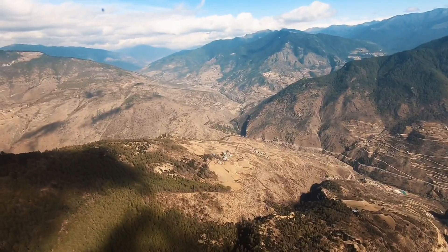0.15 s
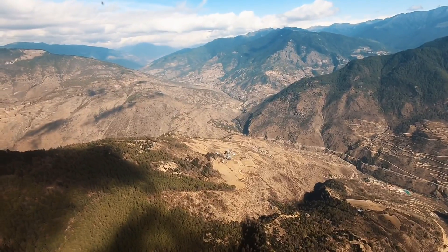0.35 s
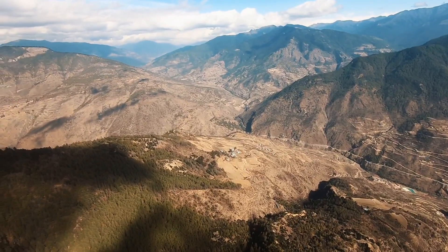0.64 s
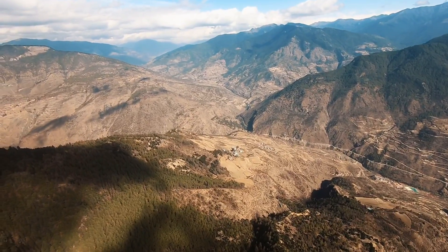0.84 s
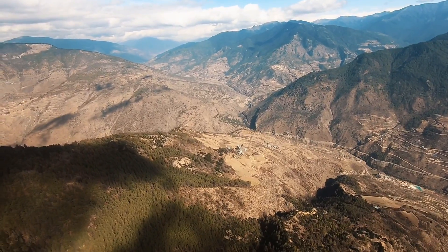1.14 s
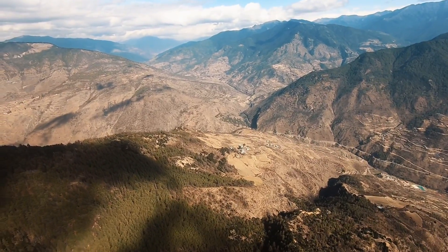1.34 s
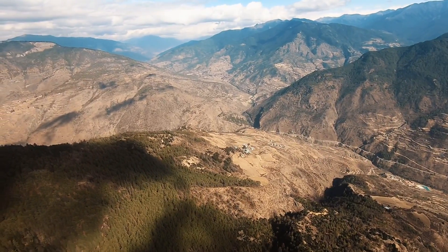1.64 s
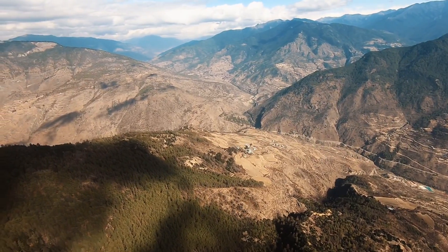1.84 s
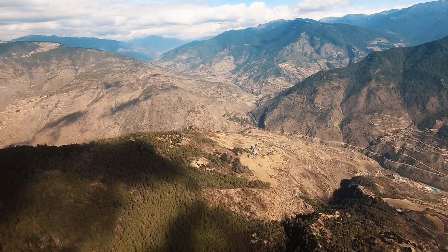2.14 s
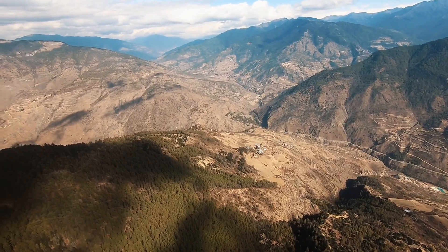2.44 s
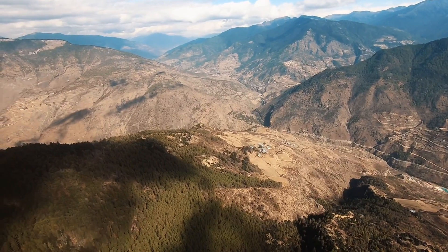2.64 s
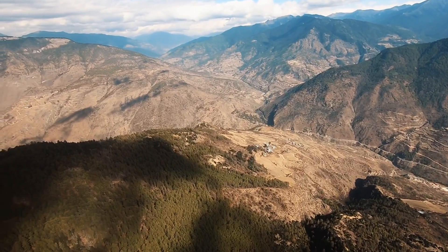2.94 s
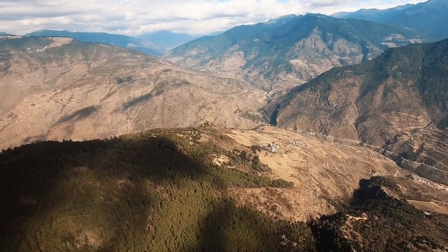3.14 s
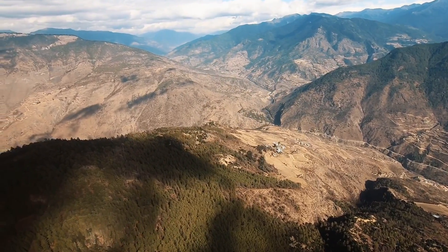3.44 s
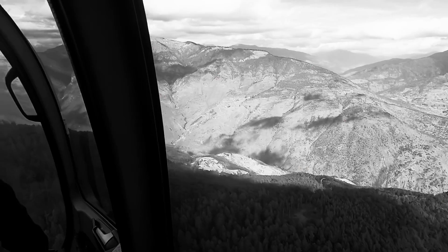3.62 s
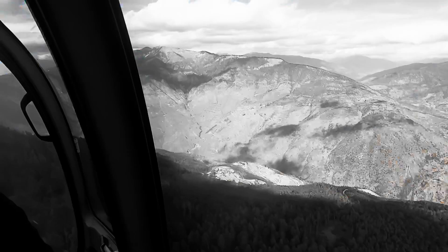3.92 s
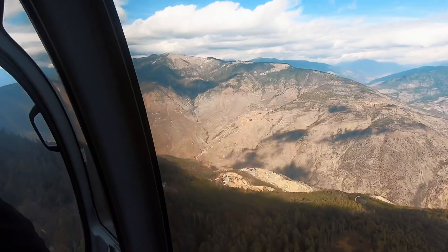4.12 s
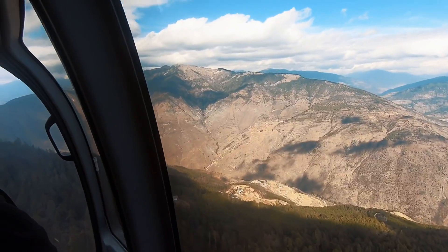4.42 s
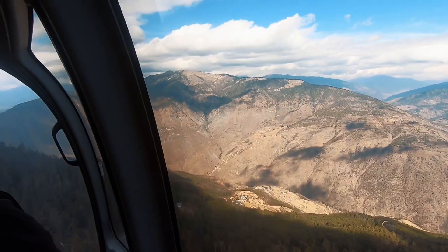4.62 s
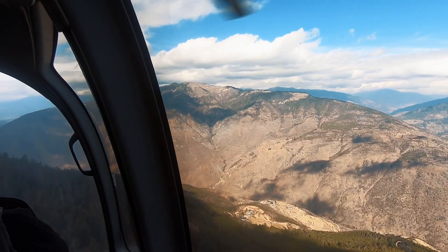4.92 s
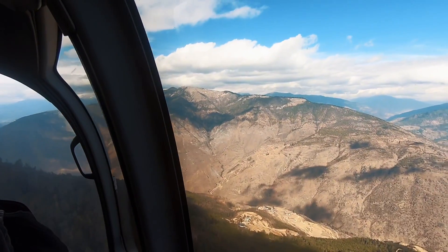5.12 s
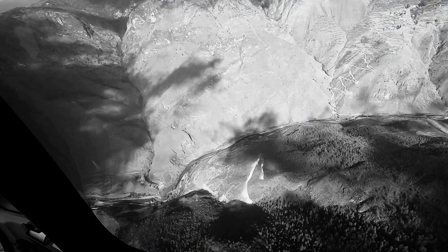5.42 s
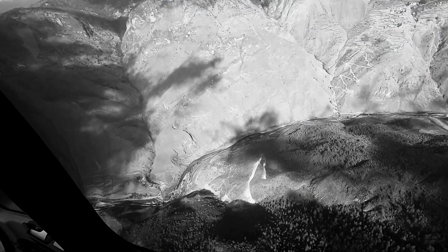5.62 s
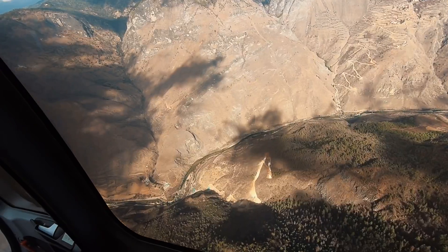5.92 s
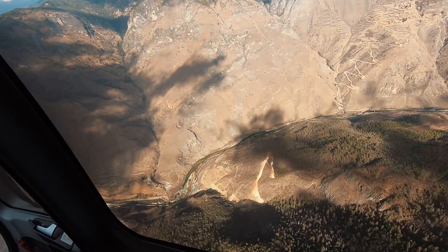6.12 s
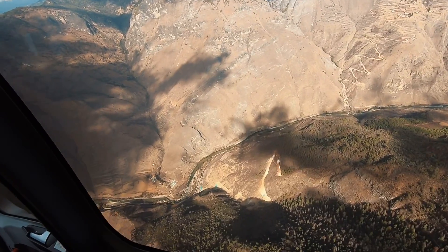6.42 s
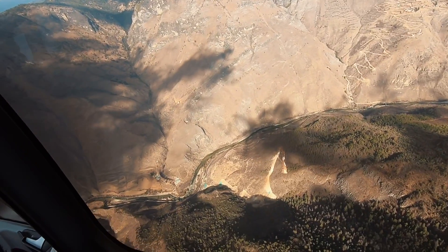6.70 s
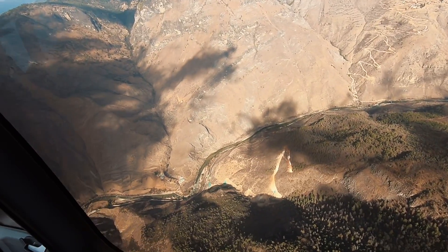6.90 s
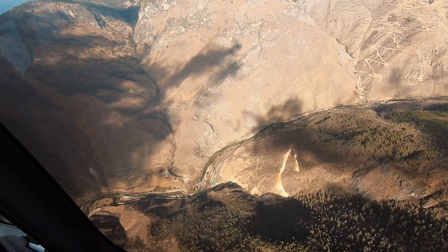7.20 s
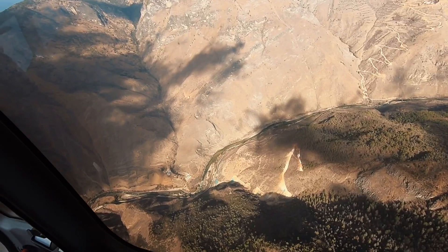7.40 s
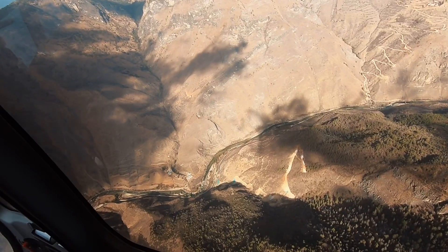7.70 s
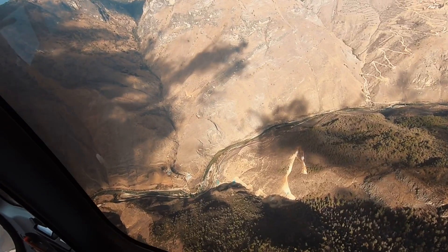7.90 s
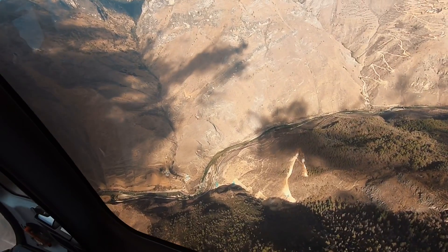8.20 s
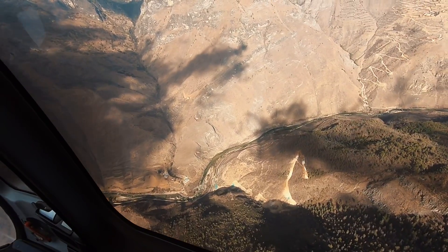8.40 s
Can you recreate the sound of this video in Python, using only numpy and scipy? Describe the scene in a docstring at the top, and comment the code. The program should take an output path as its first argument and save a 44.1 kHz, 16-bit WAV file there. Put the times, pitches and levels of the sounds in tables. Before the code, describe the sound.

Steady, bass-heavy helicopter drone heard from the cabin, blades thudding rapidly under a dull roar, its tone jumping at two hard cuts.

```python
"""Helicopter cabin in flight, heard from three seats in turn, joined by hard cuts at 3.44 s and 5.40 s.
From the first seat on, blade passes thump as low tones over buffeting air. Cabin resonances colour
the engine roar, gears whine, the turbine hisses and a faint tick recurs every 0.98 s from about 1 s.
Each cut changes levels and spectra and fades back in; at the third seat come three high chirps past 8.2 s.
Tones are wavering sines, the air is shaped noise, ticks and chirps are short sine swells."""
import sys
import numpy as np
from scipy import signal
from scipy.fft import rfft, irfft
from scipy.io import wavfile
from scipy.ndimage import uniform_filter1d, minimum_filter1d

SR = 44100
rng = np.random.default_rng(int(sys.argv[2]) if len(sys.argv) > 2 else 0)


def materialize(psi):
    """Save the field psi as 16-bit PCM at rate SR to the path in sys.argv[1].

    A 1-D psi becomes a single channel; in a 2-D psi each row is a channel.
    """
    bounded = np.clip(np.atleast_2d(psi).T, -1, 1)
    quanta = np.round(bounded * 32767).astype(np.int16)
    wavfile.write(sys.argv[1], SR, quanta)


N = 377099  # samples

# Levels are dB re full scale, rms unless called peak, before the limiter. Levels drift as the microphone turns.
# Cuts between seats: (time [s], wave height at the cut before the drop [full scale], fade-in [s])
CUTS = [(3.4358, -0.22, 0.013), (5.4037, 0.15, 0.011)]
# Blade-pass multiples: (multiple, then per seat a pair: start level [dB], end level [dB])
BLADE_MULTIPLES = [(1, (-27, -29), (-27.5, -28), (-30, -33.5)), (2, (-17.5, -16), (-18.5, -23), (-18, -18)),
                   (3, (-24, -24.5), (-24, -17.5), (-23, -21)), (4, (-23, -25.5), (-23.5, -30.5),
                   (-28, -28.5)), (5, (-38, -37), (-36.5, -41), (-39, -41.5)), (6, (-33.5, -33),
                   (-34, -33.5), (-28.5, -32.5)), (7, (-34, -30), (-37, -33), (-33, -34.5))]
# Tone beating with the third multiple, a row a seat: (time of one beat crest [s], level [dB])
BEAT_TONES = [(.91, -32), (4.44, -34.5), (6.47, -36)]
# Drive shaft hum: (level [dB]) a seat
SHAFT_LEVELS_DB = [-32, -30.5, -33]
# Hull buffeting spectrum, a list a seat: (frequency [Hz], relative density [dB per Hz])
BUFFET_SPECTRA = [
    [(5.9, -34), (10, -15.5), (37, -19.5), (61, 0), (218, -7.5), (308, -17), (378, -27.5), (600, -41.5),
     (780, -70.5), (1320, -120)],
    [(5.9, -36), (10, -24.5), (43, -18), (69, -5), (135, -5.5), (273, -14), (313, -16.5), (371, -30),
     (506, -35), (600, -47.5), (780, -55.5), (1320, -120)],
    [(5.9, -35), (10, -15.5), (48, -12), (65, -2), (98, -7.5), (135, -4.5), (292, -13.5), (318, -15),
     (365, -26.5), (600, -50), (780, -70.5), (1320, -120)],
]
# Hull buffeting, a row a seat: (start, middle, end level [dB])
BUFFET_LEVELS_DB = [(-18.5, -18.5, -16), (-18, -17, -17), (-18, -17.5, -17.5)]
# Engine roar spectrum with cabin resonances, a list a seat: (frequency [Hz], relative density [dB per Hz])
ROAR_SPECTRA = [
    [(260, -36), (450, -7), (612, -10.5), (689, -7), (736, 0), (821, -4), (1100, -5.5), (1190, -16.5),
     (1290, -13.5), (1590, -15), (1740, -13.5), (1940, -18), (2070, -23), (2380, -36.5), (2600, -38.5),
     (3380, -51), (5720, -120)],
    [(260, -21), (450, -19.5), (569, -15.5), (704, -1.5), (910, -16), (937, -13.5), (1100, -18),
     (1270, -17), (1560, -22.5), (1650, -25.5), (1690, -22.5), (1790, -22), (1870, -21.5), (2200, -33.5),
     (2600, -40.5), (3380, -45), (5720, -120)],
    [(260, -23.5), (450, -1), (541, -6), (590, -10), (704, 0.5), (763, -2), (840, -0.5), (904, -4),
     (951, -9.5), (1060, -7), (1280, -15.5), (1710, -12), (1790, -13.5), (2230, -26.5), (2600, -35.5),
     (3380, -58), (5720, -120)],
]
# Engine roar, a row a seat: (start, end level [dB])
ROAR_LEVELS_DB = [(-39, -40.5), (-39, -37), (-38, -37)]
# Turbine hiss spectrum: (frequency [Hz], relative density [dB per Hz])
HISS_SPECTRUM = [(1800, -19), (2200, -1), (3300, -3.5), (3700, -5.5), (5600, -8.5), (6000, -13.5),
                 (7000, -21.5), (9500, -28.5), (10300, -36), (11300, -30.5), (12300, -17), (14200, -21.5),
                 (15000, -26.5), (16500, -25)]
# Turbine hiss: (level [dB]) a seat
HISS_LEVELS_DB = [-56.5, -56, -56.5]
# Hollow cabin resonance, a row a seat: (start, end centre [Hz])
HOLLOW_CENTRES_HZ = [(809, 760), (700, 710), (782, 815)]
# Hollow cabin resonance, a row a seat: (start, middle, end level [dB])
HOLLOW_LEVELS_DB = [(-44.5, -48, -42), (-45.5, -42, -45), (-51, -43.5, -44.5)]
# Gear whine, a row a seat: (level [dB]) at four evenly spaced points
WHINE_LEVELS_DB = [(-58.5, -56.5, -60, -57), (-67.5, -57, -52.5, -53), (-56, -59, -51, -57.5)]
# Fifth multiple of the gear mesh, a row a seat: (level [dB]) at four evenly spaced points
MESH_FIFTH_DB = [(-72.5, -69.5, -72, -72), (-79, -61.5, -65.5, -63.5), (-82, -81, -81.5, -82)]
# Fourth multiple of the gear mesh, a row a seat: (start, middle, end level [dB])
MESH_FOURTH_DB = [(-70.5, -74.5, -64.5), (-68.5, -70, -72), (-84, -84, -86)]
# Hum bands, some around multiples of the gear mesh (1314, 1970, 3284 Hz), the rest around other shaft rates:
# (centre [Hz])
HUM_CENTRES_HZ = [817, 1260, 1314, 1970, 2490, 3128, 3284, 3850, 4310, 4650, 5010, 5510, 12450]
# The same bands: (width [Hz], first, second, third seat level [dB])
HUM_BANDS = [(45, -51.5, -60, -54), (90, -65.5, -53.5, -62), (30, -60, -61, -66), (30, -66, -65.5, -65.5),
             (30, -79, -71.5, -81.5), (80, -72.5, -66.5, -76.5), (100, -77.5, -69.5, -80),
             (50, -81, -73.5, -77.5), (130, -70.5, -67, -67.5), (150, -76, -72, -77.5),
             (150, -72.5, -74, -76), (90, -78, -73, -73.5), (200, -85, -85.5, -85)]
# High chirps: (time [s], peak level [dB])
CHIRP_EVENTS = [(8.2222, -60), (8.2741, -54.5), (8.526, -53)]

BLADES_HZ, BEAT_HZ, SHAFT_HZ = 19.69, 1.68, 102.1
WHINE_HZ, MESH_HZ = 1736.5, 656.8
FIRST_TICK_S, TICK_EVERY_S, TICK_PEAK_DB = .9757, .98419, -52.5
CABIN_T60_S, CABIN_WET_DB, CABIN_SHIFT_S = .06, -7.5, .8  # wet level re dry
LIMIT_PEAK, BAND_EDGE_HZ = 0.43, 15750


def rotor():
    """Each blade pass pushes the cabin air: low multiples of one rate, a beating neighbour and the shaft."""
    t = np.arange(N) / SR
    blade_turns = np.cumsum(BLADES_HZ + 0.031 * wander(rate_hz=1.5)) / SR
    out = tone(SHAFT_HZ, by_seat(SHAFT_LEVELS_DB), waver_hz=0.18, flutter_db=1.5)
    crest_s, beat_db = np.transpose(BEAT_TONES)
    for k, *seat_levels in BLADE_MULTIPLES:
        start_turns = by_seat(rng.random(2)[[0, 1, 1]])  # the second cut keeps step with the blades
        angle = 2 * np.pi * (k * blade_turns + start_turns)
        level_db = drift(seat_levels) + 0.91 * wander(rate_hz=5)
        out = out + np.sqrt(2) * gain_of(level_db) * np.cos(angle)
        if k == 3:
            beat_angle = angle + 2 * np.pi * BEAT_HZ * (t - by_seat(crest_s))
            out = out + np.sqrt(2) * gain_of(by_seat(beat_db)) * np.cos(beat_angle)
    return out


def buffeting():
    """Air buffets the hull: low shaped noise with a slowly wandering level."""
    level_db = drift(BUFFET_LEVELS_DB) + 1.1 * wander(rate_hz=2.5)
    return gain_of(level_db) * by_seat([noise(s, size=4096, patchy_db=0.28) for s in BUFFET_SPECTRA])


def engine_roar():
    """Engine noise shaped by the cabin's resonances at each seat."""
    level_db = drift(ROAR_LEVELS_DB) + .5 * wander(rate_hz=2.8)
    return gain_of(level_db) * by_seat([noise(s, size=1024, patchy_db=0.3) for s in ROAR_SPECTRA])


def hollow_resonance(width_hz):
    """Noise shifted up to a wandering centre: a resonance that growls in surges."""
    centre_hz = drift(HOLLOW_CENTRES_HZ) + 18 * wander(rate_hz=5)
    level_db = drift(HOLLOW_LEVELS_DB) + 0.98 * wander(rate_hz=7)
    low_pass = signal.butter(2, width_hz / 2, fs=SR, output="sos")
    a, b = signal.sosfilt(low_pass, rng.standard_normal((2, N)))
    angle = 2 * np.pi * np.cumsum(centre_hz) / SR
    return gain_of(level_db) * evened(a * np.cos(angle) + b * np.sin(angle))


def gears():
    """Thin whines of the gear mesh and fuzzy noise bands, some around further mesh multiples, the rest around
    other shaft rates."""
    whines = [(WHINE_HZ, WHINE_LEVELS_DB, 2.5, 1.0),
              (5 * MESH_HZ, MESH_FIFTH_DB, 1.8, 1.9),
              (4 * MESH_HZ, MESH_FOURTH_DB, 1.8, 1.9)]
    out = np.zeros(N)
    for hz, seat_levels, waver_hz, flutter_db in whines:
        level_db = drift(seat_levels) + 1.5 * wander(rate_hz=2.5)
        out = out + tone(hz, level_db, waver_hz, flutter_db)
    f = np.fft.rfftfreq(N, 1 / SR)
    for hz, (width_hz, *seat_db) in zip(HUM_CENTRES_HZ, HUM_BANDS):
        band = rfft(rng.standard_normal(N)) / (1 + (2 * (f - hz) / width_hz) ** 4)
        level_db = by_seat(seat_db) + 1.0 * wander(rate_hz=2.5)
        out = out + gain_of(level_db) * evened(irfft(band, N))
    return out


def turbine_hiss():
    """High shaped noise with a quickly wandering level, rippled by cabin reflections."""
    level_db = by_seat(HISS_LEVELS_DB) + 0.27 * wander(rate_hz=30)
    return cabin(gain_of(level_db) * noise(HISS_SPECTRUM, size=512, patchy_db=0.93))


def cabin(x):
    """Reflections off windows and panels ripple the spectrum; they change as the hand-held microphone moves."""
    t, place = np.arange(1, 4000) / SR, np.arange(N) / SR / CABIN_SHIFT_S
    tails = rng.standard_normal((int(place[-1]) + 2, len(t))) * gain_of(-60 * t / CABIN_T60_S)
    wet = np.zeros(N)
    for k, tail in enumerate(tails):
        near = np.cos(np.pi / 2 * np.clip(place - k, -1, 1))  # crossfade between places
        wet += signal.oaconvolve(near * x, tail / np.linalg.norm(tail))[:N]
    return (x + gain_of(CABIN_WET_DB) * wet) / np.sqrt(1 + gain_of(2 * CABIN_WET_DB))


def blips(events, hz, ring_s):
    """Short high blips: a sine under a Gaussian swell."""
    out, t = np.zeros(N), np.arange(-200, 200) / SR
    for s, peak_db in events:
        at = round(s * SR)
        swell = gain_of(peak_db) * np.exp(-(t / ring_s) ** 2)
        out[at - 145:at + 255] += swell * np.sin(2 * np.pi * hz * t)  # centred 55 samples after s
    return out


def ticks_and_chirps():
    """Regular faint ticks and three longer, higher chirps."""
    ticks = [(s, TICK_PEAK_DB) for s in np.arange(FIRST_TICK_S, N / SR, TICK_EVERY_S)]
    return blips(ticks, hz=8900, ring_s=0.00024) + blips(CHIRP_EVENTS, hz=12800, ring_s=.001)


def tone(hz, db, waver_hz, flutter_db):
    """A sine whose pitch and level waver by the given rms amounts."""
    turns = np.cumsum(hz + waver_hz * wander(rate_hz=12)) / SR + rng.random()
    level_db = db + flutter_db * wander(rate_hz=15)
    return np.sqrt(2) * gain_of(level_db) * np.sin(2 * np.pi * turns)


def noise(shape, size, patchy_db):
    """Random short-time spectra under a shape, with drifting patches; rms 1."""
    frames, hz = N // (size // 4) + 5, np.fft.rfftfreq(size, 1 / SR)
    a, b, patches = rng.standard_normal((frames, len(hz), 3)).T  # each (frequency, frame)
    patches = uniform_filter1d(patches, size=10, axis=0)
    patches = evened(uniform_filter1d(patches, size=10, axis=1))
    f, db = np.transpose(shape)
    db = np.interp(np.log(hz + 1), np.log(f + 1), db, left=-120, right=-120)
    spectra = (a + 1j * b) * gain_of(db[:, None] + patchy_db * patches)
    return evened(signal.istft(spectra, nperseg=size, noverlap=size * 3 // 4)[1][:N])


def wander(rate_hz):
    """Slow random motion of rms 1: 24 sines up to rate_hz, weaker as they quicken."""
    t = np.arange(0, N, 64) / SR
    rates_hz = np.geomspace(rate_hz / 20, rate_hz, 24)
    slow = sum(np.sin(2 * np.pi * (f * t + rng.random())) / np.sqrt(f) for f in rates_hz)
    return np.interp(np.arange(N) / SR, t, evened(slow))


def drift(seats):
    """Spreads each seat's values evenly over its time, joined by straight lines."""
    t, ends = np.arange(N) / SR, [0] + [cut[0] for cut in CUTS] + [N / SR]
    lines = [np.interp(t, np.linspace(a, b, len(v)), v) for a, b, v in zip(ends, ends[1:], seats)]
    return by_seat(lines)


def by_seat(sounds):
    """Each seat holds from its cut to the next."""
    cuts = [round(cut[0] * SR) for cut in CUTS]
    return np.choose(np.searchsorted(cuts, np.arange(N), "right"), sounds)


def evened(x):
    """Scales to rms 1."""
    return x / np.sqrt(np.mean(x ** 2) + 1e-20)


def gain_of(db):
    """Decibels to gain."""
    return 10 ** (np.asarray(db) / 20)


def scene():
    """Sums the cabin's sources."""
    low = rotor() + buffeting() + engine_roar() + hollow_resonance(width_hz=140)
    high = gears() + turbine_hiss() + ticks_and_chirps()
    return (low + high)[None]


def record(dry):
    """A quick limiter holds the bass peaks, the cuts break the wave, then the band limit."""
    bass = signal.sosfiltfilt(signal.butter(2, 500, fs=SR, output="sos"), dry[0])
    over = np.maximum(abs(bass) / LIMIT_PEAK, 1)
    gain = minimum_filter1d(over ** -.75, size=500)
    gain = uniform_filter1d(uniform_filter1d(gain, size=250), size=250)
    x, t = dry[0] + (gain - 1) * bass - .0045, np.arange(N) / SR  # small constant offset
    x = x * np.clip(t / 0.0022, 0, 1)  # opens from silence
    for s, height, fade_s in CUTS:
        at = round(s * SR)
        before = t < at / SR
        lead = np.exp(-((t - s) / 0.0027) ** 2) * before
        x = x + (height - x[at - 1]) * lead  # bends the wave to its height at the cut
        fall = np.clip((at / SR - t) / .00006, 0, 1)  # drops within a few samples
        rise = np.clip((t - at / SR) / fade_s, 0, 1)
        x = x * np.where(before, fall, rise)
    low_pass = signal.firwin(1023, BAND_EDGE_HZ, window=("kaiser", 9), fs=SR)
    return signal.oaconvolve(np.pad(x, 511, "reflect"), low_pass, "valid")[None]


dry = scene()
out = record(dry)
materialize(out)
```